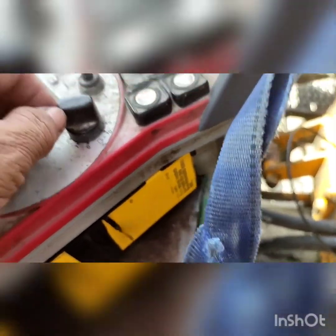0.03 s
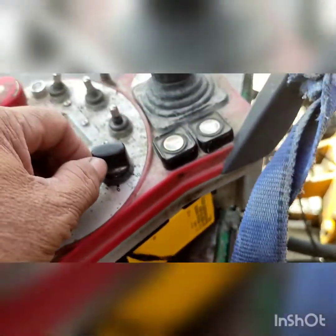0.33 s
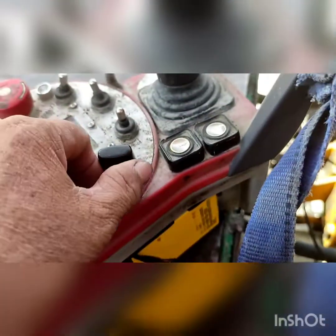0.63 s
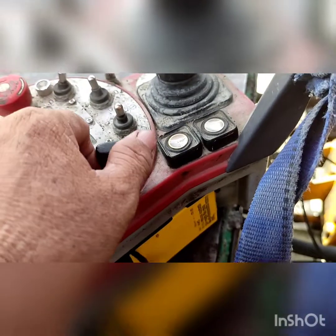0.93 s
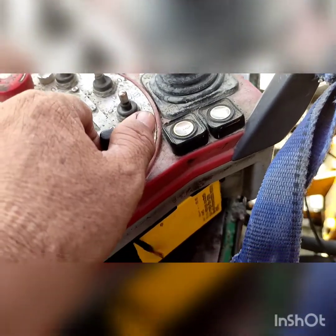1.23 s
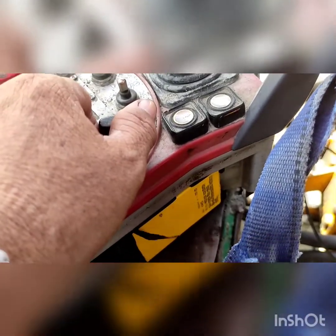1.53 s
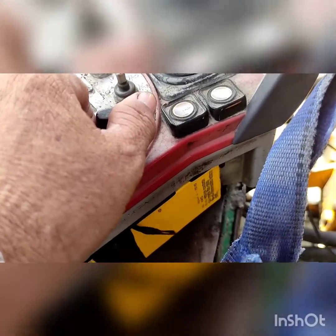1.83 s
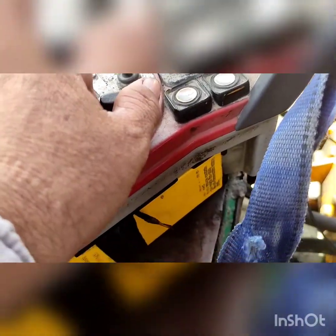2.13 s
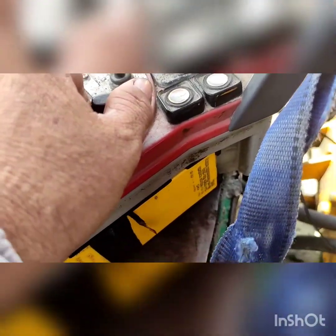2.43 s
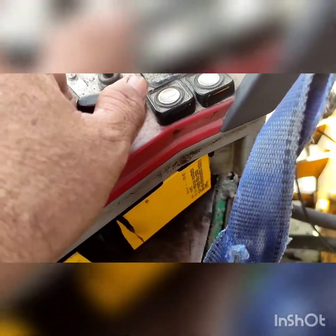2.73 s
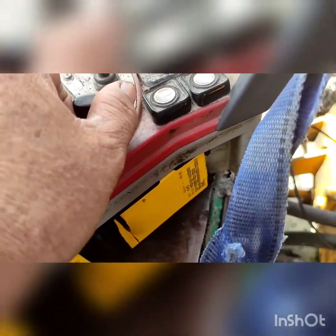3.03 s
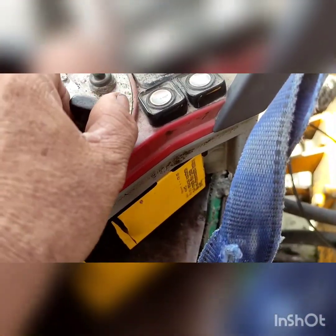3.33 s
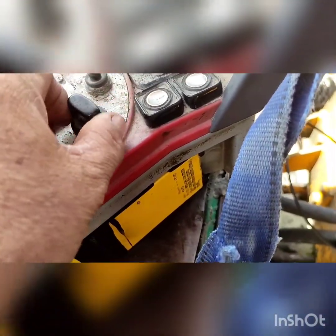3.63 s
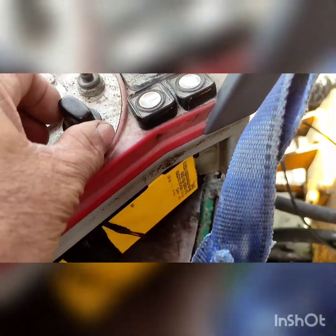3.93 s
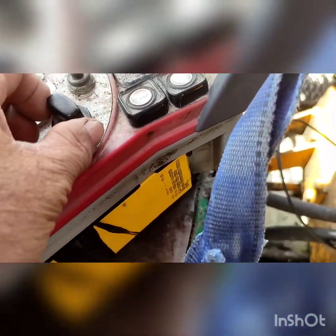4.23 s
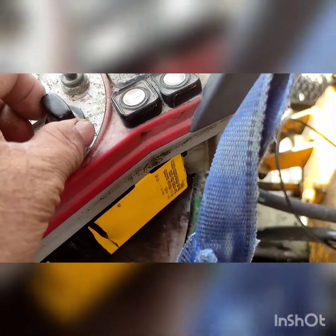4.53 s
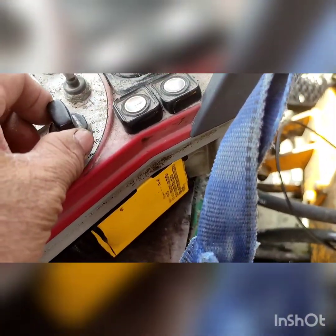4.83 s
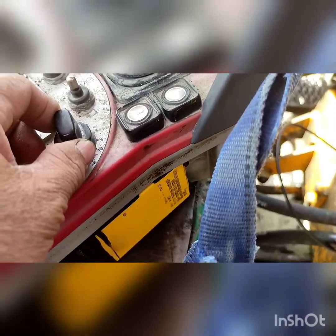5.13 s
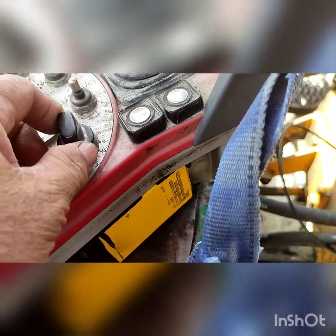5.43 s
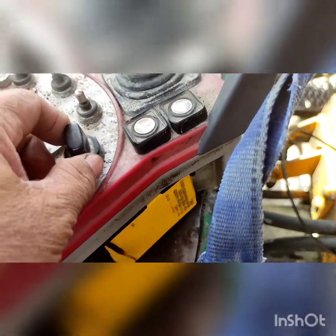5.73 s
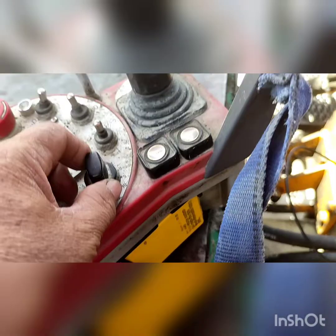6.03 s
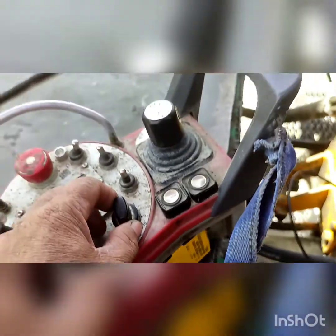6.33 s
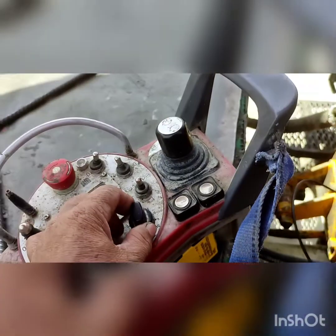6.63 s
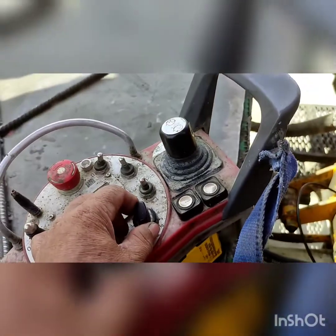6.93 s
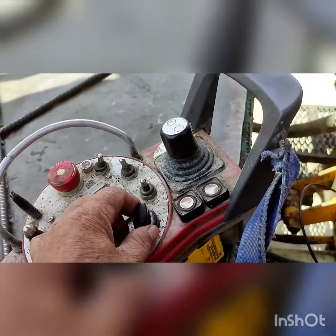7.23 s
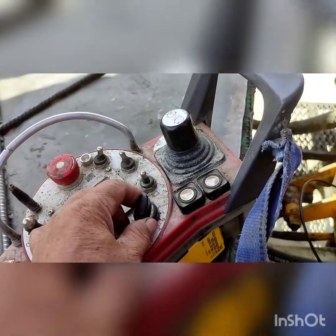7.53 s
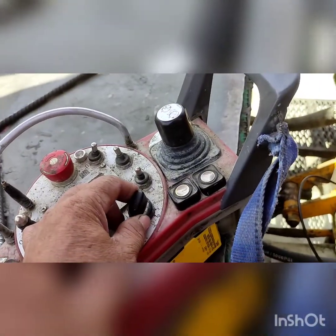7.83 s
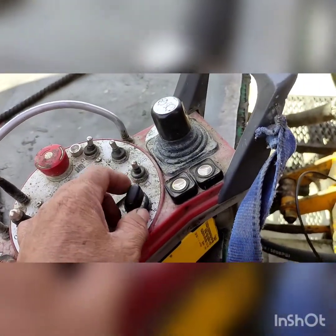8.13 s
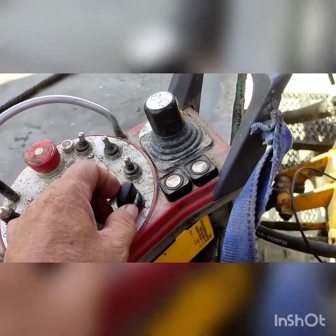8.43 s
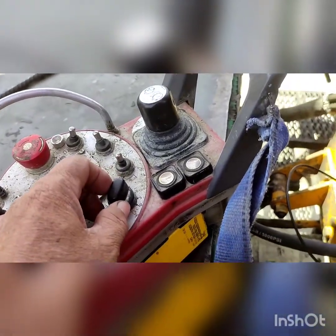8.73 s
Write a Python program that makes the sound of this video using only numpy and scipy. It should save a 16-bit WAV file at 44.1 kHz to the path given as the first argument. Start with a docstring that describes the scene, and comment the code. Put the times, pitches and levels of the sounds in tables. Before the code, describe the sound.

Three hisses of hydraulic oil, each ending in a ringing metal slam, cut through the constant roar and whine of a diesel machine.

```python
"""At the control panel of a diesel concrete pump running at steady speed. The engine roars and clatters;
the hydraulic piston pump and drive gears whine at multiples of shaft speed. Three times the stroke
changes over: pressure drops, oil hisses through a valve, the swing tube slams home and the pipe groans.
Each slam ducks the microphone's limiter. Late on, the microphone draws back, then comes close again."""
import sys
import numpy as np
from scipy import signal
from scipy.fft import rfft, irfft, next_fast_len
from scipy.io import wavfile
from scipy.ndimage import uniform_filter1d, minimum_filter1d, map_coordinates

SR = 44100
rng = np.random.default_rng(int(sys.argv[2]) if len(sys.argv) > 2 else 0)


def transcribe(signal):
    """Save signal, clipped to [-1, 1], as a 16-bit WAV file at the path in sys.argv[1]."""
    frames = np.atleast_2d(signal).T
    limited = np.clip(frames, -1, 1)
    pcm = np.round(limited * 32767).astype(np.int16)
    wavfile.write(sys.argv[1], SR, pcm)


N = 386757
TIME_S = np.arange(N) / SR
# Level changes, pump unloaded (idle = 1)
IDLE_RUMBLE_DB, IDLE_CLATTER_DB, IDLE_WHINE_DB = -4, -0.6, -8


# Exhaust, fan and injector spectra: freq_hz, density_db
EXHAUST_SPECTRUM = [(20, -30), (45, -20), (75, -9), (120, 0), (200, -2), (300, -4.5), (600, -17.5),
                    (1500, -70)]
FAN_SPECTRUM = [(80, -32), (180, -5.5), (270, -1.5), (390, 3), (520, -3.5), (690, -6.5), (770, -2),
                (850, -10), (1220, -7.5), (1500, -16), (3000, -62)]
INJECTOR_SPECTRUM = [(500, -18), (1100, -19.5), (1600, 5), (1950, -3), (2150, -0.5), (2550, -8.5),
                     (2900, -8.5), (3330, -12.5), (3750, -15), (4200, -11), (5500, -18.5), (7300, -20),
                     (8800, -19), (12000, -21), (15500, -33)]
RUMBLE_DB, ROAR_DB, CLATTER_DB = -20, -18.5, -29.5
# Level changes, microphone drawn back (back = 1)
BACK_RUMBLE_DB, BACK_ROAR_DB, BACK_CLATTER_DB = -3.8, 1.3, 0.5
REPEAT_SHARE = .55

def engine(turns, idle, back):
    """Exhaust rumble, fan roar and injector clatter; four unequal cylinders, two firings a turn."""
    cylinders = np.array([0.91, 0.42, 0.34, 0.3])
    firing = cylinders[(2 * turns).astype(int) % len(cylinders)] * np.exp(-(2 * turns % 1) / 0.75)
    rumble = stereo_noise(EXHAUST_SPECTRUM, lag_s=.0001, patchy_db=1.5)
    rumble = unit(rumble * (1 + 0.5 * firing) * amp(0.53 * wobble(12)))
    roar = stereo_noise(FAN_SPECTRUM, lag_s=.00028, patchy_db=2.5)
    roar = unit(roar * (1 + 0.07 * firing) * amp(0.11 * wobble(5.7)))
    ticking = np.sqrt(REPEAT_SHARE) * cycle_rattle(turns)
    ticking += np.sqrt(1 - REPEAT_SHARE) * rng.standard_normal((2, N))
    clatter = stereo_noise(INJECTOR_SPECTRUM, lag_s=.000339, patchy_db=2.5, source=ticking)
    clatter = unit(clatter * (1 + 0.47 * firing) * amp(1.2 * wobble(30)))
    return (amp(RUMBLE_DB + IDLE_RUMBLE_DB * idle + BACK_RUMBLE_DB * back) * rumble
            + amp(ROAR_DB + BACK_ROAR_DB * back) * roar
            + amp(CLATTER_DB + IDLE_CLATTER_DB * idle + BACK_CLATTER_DB * back) * clatter
            + halo_and_ringing(clatter, idle, back))


# Governor overshoots: centre_s, half_length_s, rise_rpm
SURGES = [(.55, .4, 4), (3.8, .22, 7), (7.15, .35, 12), (8.1, .2, 7)]
GOVERNED_RPM, SAG_RPM, SAG_PEAK_S = 2146, 10, .3

def crankshaft():
    """Turns so far; speed sags as each stroke takes load, surges and trembles."""
    ages = [np.maximum(TIME_S - slam_s, 0) / SAG_PEAK_S for _, _, slam_s, *_ in CHANGEOVERS]
    rpm = GOVERNED_RPM - SAG_RPM * sum(age * np.exp(1 - age) for age in ages) + bumps(SURGES)
    return np.cumsum(rpm * (1 + .0004 * wobble(14))) / (60 * SR)


# Piston harmonics, lowest first: level_db, balance_db, back_lift_db, swell_share
PISTON_LINES = [(-26, 1, 0.5, 0.56), (-29, -7.5, 8, 0.73), (-34, 5.5, 6.5, 0.07), (-27.5, 9.5, 3.5, 0.1)]
# Left lead per harmonic: close_ms, back_ms
PISTON_LEADS = [(.03, .1), (.15, -.2), (.2, .16), (.23, .35)]
# Swells, shared and top harmonic only: centre_s, half_length_s, lift_db
PISTON_SWELLS = [(1.13, 0.12, 10), (2.85, 0.13, 6.5), (3.68, 0.16, 6.5), (5.38, 0.25, 8.5)]
TOP_SWELLS = [(5, 1, 4.5), (6.05, 0.27, 2)]
PISTON_COUNT = 9

def hydraulic_pump(turns, idle, back):
    """Pistons sing under pressure and fade at each changeover."""
    lowest_db, piston_db, *_ = stroke_levels()
    swell_db = bumps(PISTON_SWELLS)
    spread = np.interp(back, [0, .5], [1, .15])  # near centre from halfway back
    lines = []
    for k, (db, balance_db, back_db, share) in enumerate(PISTON_LINES):
        gain = amp(db + back_db * back + share * swell_db + 1.2 * wobble(4))
        lag_s = np.interp(back, [0, .5], PISTON_LEADS[k]) / 1000
        order = PISTON_COUNT * (k + 1)
        lines.append(gain * shaft_tone(turns, order, spread * balance_db, waver=.16, lag_s=lag_s))
    lowest, *middle, highest = lines
    pistons = amp(lowest_db) * lowest + sum(middle) + amp(bumps(TOP_SWELLS)) * highest
    return amp(IDLE_WHINE_DB * idle + piston_db) * pistons


# Gear mesh at the moving microphone: time_s, level_db, balance_db, left_lead_ms
MESH_PATH = [(0, -27, 3, .17), (1.9, -26.5, 5, .19), (2.4, -20, 8, .19), (4.4, -20, 6, .17),
             (5.4, -21, 6, .16), (5.8, -24, 1, 0), (6.16, -23.5, 1, -.08), (6.2, -24, 0, -.42),
             (6.35, -21, 0, -.43), (6.42, -20, 0, -.5), (6.78, -20, 0, -.53), (6.9, -23, 0, -.46),
             (7.3, -23.5, 0, -.42), (7.55, -26, -2, -.51), (7.97, -25, -1, -.51), (8.01, -24, 2, -.04),
             (8.2, -23, 2, -.08), (8.55, -23, 0, -.28)]
# Mesh harmonics, second up: level_db, back_lift_db
MESH_OVERTONES = [(-33.5, 0.5), (-51, 2)]
MESH_ORDER, OVERTONE_FOLLOW = 33, .35
FLUTTER_START_S, FLUTTER_END_S, FLUTTER_HZ, FLUTTER_MS = 6.36, 6.78, 13, .07

def drive_gear(turns, idle, back):
    """Mesh whine; shifts between left and right as the microphone moves, with a brief fast tremble."""
    level_db, balance_db, lead_ms = curves(MESH_PATH)
    flutter = np.sin(2 * np.pi * FLUTTER_HZ * TIME_S + wobble(9))
    lead_ms += FLUTTER_MS * window(FLUTTER_START_S, FLUTTER_END_S, .05, .05) * flutter
    mesh = shaft_tone(turns, MESH_ORDER, balance_db, waver=.14, lag_s=lead_ms / 1000)
    overtones = 0
    for k, (db, back_db) in enumerate(MESH_OVERTONES, 2):
        line = shaft_tone(turns, k * MESH_ORDER, balance_db=9, waver=.33, lag_s=.00022)
        uneven_teeth = 1 + .45 * wobble(130)
        overtones += amp(db + back_db * back) * unit(line * uneven_teeth)
    load_db = level_db + IDLE_WHINE_DB * idle
    return amp(load_db) * mesh + amp(OVERTONE_FOLLOW * (load_db - level_db.max())) * overtones


# Stroke changeovers:
# drop_s, open_s, slam_s, hiss_db, rise_s, balance_db, whistle_hz, whistle_lift_db, slam_db
CHANGEOVERS = [(1.89, 1.883, 2.136, -25, .036, 3, 11900, 6, 8),
               (5.45, 5.444, 5.67, -21.5, .016, -.5, 10700, 3, 7),
               (8.18, 8.238, 8.468, -24, .028, 2.5, 12000, 3.5, 6)]
# Oil jet spectrum: freq_hz, density_db
JET_SPECTRUM = [(600, -30), (1500, 3), (3200, 1), (4500, -1), (5200, -3), (6700, -1), (7400, -5),
                (8700, -2), (10700, 4), (11400, 0.5), (11900, 3.5), (13200, -2), (15000, -3.5),
                (15900, -10)]
# Jet shading, right channel: freq_hz, gain_db
JET_SHADE = [(9300, 0), (10600, -12), (15000, -9)]
# Jet spits and lulls: centre_s, half_length_s, gain_db
SPURTS = [(1.932, .012, 11), (1.985, .025, 2.5), (5.459, .003, 11.5), (5.473, .006, 8), (5.55, .05, -2),
          (5.612, .018, 4.5), (5.655, .014, 5), (8.268, .01, 10), (8.32, .03, 5), (8.455, .015, 1.5)]
LINE_T60_S, SHUT_T60_S = 0.0092, 0.13
RASP_DB, RASP_SPIT_SHARE = -4.5, .7

def valve():
    """Oil spits, rasps, whistles and rings in the line until the tube slams home."""
    out, ring_t = np.zeros((2, N)), TIME_S[:SR // 20]
    jet = stereo_noise(JET_SPECTRUM, lag_s=.00002, patchy_db=4.5)
    jet *= amp(1.2 * wobble(35) + 1.3 * wobble(250))
    rasp, spit_db = cavitation(), bumps(SPURTS)
    rasp *= amp(RASP_DB + RASP_SPIT_SHARE * spit_db)
    for _, open_s, slam_s, db, rise_s, balance_db, whistle_hz, lift_db, _ in CHANGEOVERS:
        opening = np.clip((TIME_S - open_s) / rise_s, 0, 1) ** 2
        closing = amp(-60 * np.maximum(TIME_S - slam_s, 0) / SHUT_T60_S)
        ring = rng.standard_normal(len(ring_t)) * amp(-60 * ring_t / LINE_T60_S)
        ringing = jet + .5 * signal.oaconvolve(jet, ring[None] / np.linalg.norm(ring), axes=1)[:, :N]
        left_db = lambda hz: lift_db / (1 + ((hz - whistle_hz) / 500) ** 2)
        hiss = unit(filtered(ringing, lambda hz: amp([left_db(hz), along(JET_SHADE, hz)])))
        out += amp(db) * opening * closing * pan(balance_db) * (amp(spit_db) * hiss + rasp)
    return out


# Valve body resonances: centre_hz, width_hz, level_db, balance_db
VALVE_MODES = [(1750, 600, -3, 4), (2400, 700, -1, 5), (3250, 600, 0, 4), (4100, 260, -5, 2),
               (4600, 220, -2.5, 0), (5450, 300, -5.5, -1), (6700, 320, -5, 0)]
COLLAPSES_PER_S, CLUMP_DB, MODE_SHIFT_DB = 2500, 4, 2.5

def cavitation():
    """Bubbles collapse in clumps and ring the valve body; rms 1."""
    rate = COLLAPSES_PER_S * amp(CLUMP_DB * wobble(90))
    pops = (rng.random(N) < rate / SR) * (rng.standard_normal(N) + rng.standard_normal((2, N)))
    rasp = 0
    for centre_hz, width_hz, db, balance_db in VALVE_MODES:
        band = lambda hz: (1j * hz * width_hz / (centre_hz ** 2 - hz ** 2 + 1j * hz * width_hz)) ** 2
        rasp += amp(db + MODE_SHIFT_DB * wobble(22)) * pan(balance_db) * unit(filtered(pops, band))
    return unit(rasp)


DROP_S, BUILD_S = 0.03, 0.27

def unloaded():
    """Oil pressure loss: 1 in a changeover, 0 under full load."""
    return sum(window(drop_s, slam_s, DROP_S, BUILD_S) for drop_s, _, slam_s, *_ in CHANGEOVERS)


# Pump strokes: lowest_piston_db, all_pistons_db, gear_pair_db, gear_pair_balance_db
STROKES = [(3, -0.5, 5.5, 15.5), (-6, 0, 0.5, 2), (2, 0, 0.5, 11), (-8, 0, -1, 5)]

def stroke_levels():
    """Stroke settings per sample, crossfaded over each changeover."""
    edges_s = [s for drop_s, _, slam_s, *_ in CHANGEOVERS for s in (drop_s, slam_s)]
    return curves(np.column_stack([[0, *edges_s, N / SR], np.repeat(STROKES, 2, axis=0)]))


# Tube and hopper modes: pitch_hz, level_db, t60_s
TUBE_MODES = [(252, -10.5, 0.98), (309, -14, 0.52), (372, -4.5, 0.45), (435, -8.5, 0.068),
              (458, -9.5, 0.44), (568, -5.5, 0.065), (669, -2, 0.1), (740, -5, 0.11), (1000, -17, 0.11),
              (1420, -5, 0.026), (1710, -30, 0.065), (2200, -20, 0.12)]
REBOUND_S, REBOUND_DB = .009, -8

def slams():
    """The swing tube hits its stop, rebounds once and rings the hopper."""
    t, out = TIME_S[:SR // 2], np.zeros((2, N))
    crunch_spectrum = [(100, -24), (600, 4.5), (2000, -9.5), (6000, -37), (15000, -56)]
    for _, _, slam_s, *_, slam_db in CHANGEOVERS:
        ring = 0
        for hz, db, t60_s in TUBE_MODES:
            envelope = amp(db + rng.normal(0, 1.5) - 60 * t / t60_s)
            ring += envelope * np.sin(2 * np.pi * (hz * t + rng.random()) + rng.normal(0, .4, (2, 1)))
        crunch = shaped(rng.standard_normal((2, len(t))), crunch_spectrum)
        blow = (ring + 0.96 * crunch * amp(-60 * t / .08)) * (1 - np.exp(-t / 0.0006))
        blow += amp(REBOUND_DB) * np.pad(blow, ((0, 0), (round(REBOUND_S * SR), 0)))[:, :len(t)]
        add(out, slam_s, amp(slam_db) * blow / np.abs(blow).max())
    return out


GROAN_FROM_HZ, GROAN_TO_HZ, GROAN_FALL_S = 700, 255, .047
GROAN_DB, GROAN_T60_S = -12.5, .75

def groans():
    """After each slam the pipe rings on: a rough note, sinking as the surge dies."""
    t, out = TIME_S[:SR // 2], np.zeros((2, N))
    hz = GROAN_TO_HZ + (GROAN_FROM_HZ - GROAN_TO_HZ) * np.exp(-t / GROAN_FALL_S)
    glide = np.exp(2j * np.pi * np.cumsum(hz) / SR)
    envelope = (1 - np.exp(-t / 0.013)) * amp(GROAN_DB - 60 * t / GROAN_T60_S)
    for _, _, slam_s, *_ in CHANGEOVERS:
        roughness = 1 + .6 * (wobble(110) + 1j * wobble(110))[:len(t)]
        add(out, slam_s, pan(0) * envelope * unit(np.real(roughness * glide)))
    return out


# Frame and hose jolts: start_s, peak_db, centre_hz, length_s, rattle_db
JOLTS = [(1.589, -12, 160, 0.027, -30), (1.734, -4.5, 188, .025, -30), (1.934, -4.5, 280, 0.071, -11),
         (3.969, -8, 129, 0.014, -22), (5.495, -5, 308, 0.014, -31), (8.189, 1, 224, 0.027, -7),
         (8.216, 0, 330, 0.015, -38), (8.244, -0.5, 357, 0.11, -34), (8.276, -8, 235, 0.031, -30),
         (8.32, -6, 300, 0.12, -13), (8.675, -6.5, 95, 0.067, -22)]

def jolts():
    """Pressure kicks shake frame and hoses: dull thuds with a little metal rattle."""
    t, out = TIME_S[:SR // 2], np.zeros((2, N))
    rattle_spectrum = [(200, -21), (700, -5.5), (2200, -21.5), (5000, -34.5), (15000, -37)]
    for start_s, db, centre_hz, length_s, rattle_db in JOLTS:
        noise = rng.standard_normal(len(t)) + 0.33 * rng.standard_normal((2, len(t)))
        thud = unit(filtered(noise, lambda hz: hz / (hz + 80) / (1 + ((hz - centre_hz) / 70) ** 2)))
        envelope = (1 - np.exp(-t / 0.00096)) * np.exp(-(t / length_s) ** 2)
        shudder = (thud + amp(rattle_db) * shaped(noise, rattle_spectrum)) * envelope
        add(out, start_s, amp(db) * shudder / np.abs(shudder).max())
    return out


# Steady engine and gear lines: cycles_per_turn
HUM_ORDERS = [2, 5.5, 7.5, 11, 14.25, 15, 16.5, 34, 37, 45, 54, 72, 82.5, 90, 101]
# Same lines: level_db
HUM_DB = [-40, -29, -29, -28.5, -44.5, -33, -35, -40, -42.5, -54.5, -44, -42, -45, -47.5, -64]
# Beating gear pair: cycles_per_turn
PAIR_ORDERS = [49.5, 50.85]
PAIR_DB = -38.5

def hum(turns, idle):
    """Engine and gear lines locked to the crankshaft; higher ones waver more."""
    steady = 0
    for order, db in zip(HUM_ORDERS, HUM_DB):
        balance_db = 0.93 * along(MIC_BALANCE, order * turns[-1] * SR / N)
        steady += amp(db) * shaft_tone(turns, order, balance_db, waver=0.25 + 0.0035 * order)
    *_, stroke_db, balance_db = stroke_levels()
    pair = sum(shaft_tone(turns, order, balance_db, waver=.32, lag_s=.00024) for order in PAIR_ORDERS)
    return steady * amp(IDLE_CLATTER_DB * idle) + pair * amp(PAIR_DB + stroke_db + IDLE_WHINE_DB * idle / 2)


BUZZ_DB = -35

def buzz(turns, idle):
    """Valve gear and injectors repeat one ragged rattle every engine cycle."""
    spectrum = [(400, -11), (700, 26), (1000, -36), (1650, 9.0),
                (2600, 6.5), (3700, -33.0), (5000, -36), (9000, -66)]
    return shaped(cycle_rattle(turns), spectrum) * amp(BUZZ_DB + IDLE_CLATTER_DB * idle)


def cycle_rattle(turns, size=2048):
    """Stereo noise repeating every two turns; rms 1."""
    cycle = rng.standard_normal((2, size))
    return unit(np.array([np.interp(turns / 2 % 1 * size, np.arange(size), side) for side in cycle]))


# Whine halo (second row) and ringing bands: centre_hz, width_hz, level_db, back_lift_db
NARROW_BANDS = [(1790, 90, -42.5, -1), (2380, 170, -37, 1.5), (2720, 110, -46, 3.5), (3580, 120, -49, 1)]

def halo_and_ringing(clatter, idle, back):
    """Rough, hissy halo round the gear whine's second harmonic, plus narrow ringing bands of clatter."""
    out = 0
    for centre_hz, width_hz, db, back_db in NARROW_BANDS:
        band = filtered(clatter, lambda hz: 1 / (1 + (2 * (hz - centre_hz) / width_hz) ** 4))
        out += amp(db + back_db * back) * unit(band)
    return amp(IDLE_WHINE_DB * idle) * out


# Drone dips: start_s, end_s, bass_db, right_treble_db
DIPS = [(1.247, 1.52, -1, -6), (1.764, 1.912, -0.5, -9), (3.97, 4.474, -2, -9)]
CROSSOVER_HZ, DIP_EDGE_S = 544, 0.061

def dipped(drone):
    """Brief dips: both channels lose some bass, the right its treble."""
    bass_db = right_db = 0
    for start_s, end_s, low_db, high_db in DIPS:
        gate = window(start_s, end_s, DIP_EDGE_S, DIP_EDGE_S)
        bass_db += gate * low_db
        right_db += gate * high_db
    treble = filtered(drone, lambda hz: hz ** 2 / (hz ** 2 + CROSSOVER_HZ ** 2))
    return amp(bass_db) * (drone - treble) + np.array([treble[0], amp(right_db) * treble[1]])


# Likeness of the microphone channels: freq_hz, coherence
MIC_COHERENCE = [(60, .42), (130, .58), (290, .82), (640, .55), (1400, .45), (3000, .35), (15000, .25)]
# Left over right: freq_hz, balance_db
MIC_BALANCE = [(60, -3), (180, -1.2), (380, -.1), (700, 0), (1300, 3), (2400, 7), (4400, 0), (8000, 0),
               (15000, 4)]

def stereo_noise(spectrum, lag_s, patchy_db, source=None):
    """Noise or source, coloured in shifting patches, right channel late; rms 1."""
    def colour(hz):
        angle = np.arccos(np.clip(along(MIC_COHERENCE, hz), 0, 1)) / 2
        return amp(along(spectrum, hz)) * np.array([np.cos(angle), np.sin(angle)])
    def placement(hz):
        return pan(along(MIC_BALANCE, hz)) * np.exp(-2j * np.pi * hz * np.array([[0], [lag_s]]))
    frames = signal.stft(rng.standard_normal((2, N)) if source is None else source, nperseg=512)[2]
    patches = uniform_filter1d(rng.standard_normal(frames.shape[1:]), size=4, axis=0)
    patches = unit(uniform_filter1d(patches, size=12, axis=1))
    patchy = signal.istft(frames * amp(patchy_db * patches), nperseg=512)[1][:, :N]
    mid, side = filtered(patchy, colour)
    return unit(filtered(np.array([mid + side, mid - side]), placement))


def shaft_tone(turns, order, balance_db, waver, lag_s=0.00021):
    """Sine at a shaft order, wavering with shifting reflections; rms 1."""
    hz = order * turns[-1] * SR / N
    phase = 2 * np.pi * (order * turns + rng.random() - hz * lag_s * np.array([[0], [1]]))
    phase += waver * np.array([wobble(6), wobble(5.5)])
    return unit(pan(balance_db) * np.sin(phase) * np.exp(waver * (wobble(7) + wobble(45)) / 2))


def amp(db):
    """Decibels to gain."""
    return 10 ** (np.asarray(db) / 20)


def unit(x):
    """x at rms 1."""
    return x / np.sqrt(np.mean(x ** 2) + 1e-20)


def along(points, hz):
    """Interpolate (freq_hz, value) points on a log axis."""
    freqs, values = np.transpose(points)
    return np.interp(np.log(hz + 1), np.log(freqs + 1), values)


def curves(rows):
    """Per-sample curve for each column after time_s."""
    times, *columns = np.transpose(rows)
    return [np.interp(TIME_S, times, column) for column in columns]


def wobble(rate_hz):
    """Smooth random curve, rate_hz knots a second."""
    coarse = np.arange(0, N + 64, 64)
    knots = rng.standard_normal(int(N * rate_hz / SR) + 4)
    return np.interp(np.arange(N), coarse, map_coordinates(knots, [coarse * rate_hz / SR]))


def window(start_s, end_s, rise_s, fall_s):
    """Trapezoid: rises from start_s, falls from end_s."""
    return np.clip((TIME_S - start_s) / rise_s, 0, 1) * np.clip(1 - (TIME_S - end_s) / fall_s, 0, 1)


def bumps(rows):
    """Sum of Gaussian humps."""
    return sum(height * np.exp(-((TIME_S - centre_s) / half_s) ** 2) for centre_s, half_s, height in rows)


def filtered(x, response):
    """Apply a complex frequency response."""
    size = x.shape[-1]
    padded = next_fast_len(size + SR // 2)
    return irfft(rfft(x, padded) * response(np.fft.rfftfreq(padded, 1 / SR)), padded)[..., :size]


def shaped(x, spectrum):
    """Filter by (freq_hz, gain_db) points; rms 1."""
    return unit(filtered(x, lambda hz: amp(along(spectrum, hz))))


def pan(balance_db):
    """Constant-power gains; positive is left."""
    gains = amp(np.array([np.atleast_1d(balance_db), -np.atleast_1d(balance_db)]) / 2)
    return gains / np.sqrt(np.mean(gains ** 2, axis=0))


def add(track, start_s, sound):
    """Mix in a stereo sound."""
    part = track[:, round(start_s * SR):][:, :sound.shape[1]]
    part += sound[:, :part.shape[1]]


# Microphone position (0 at the panel, 1 drawn back): time_s, back
MIC_PATH = [(6.15, 0), (6.25, .5), (6.42, .5), (6.52, .3), (6.72, .33), (6.88, 1), (7.9, 1), (8.03, .15)]

def scene():
    """One crankshaft drives the drone; changeovers unload it and add hiss and blows."""
    turns, idle, back = crankshaft(), unloaded(), curves(MIC_PATH)[0]
    drone = (engine(turns, idle, back) + buzz(turns, idle) + hum(turns, idle)
             + hydraulic_pump(turns, idle, back) + drive_gear(turns, idle, back))
    return dipped(drone) + valve() + slams() + groans() + jolts()


def limiter(x, ceiling_db, hold_s, release_db_per_s):
    """Loud moments pull the gain down; it holds, then recovers."""
    power = np.abs(uniform_filter1d(np.mean(x ** 2, axis=0), size=160))
    over_db = np.maximum(10 * np.log10(power + 1e-9) - ceiling_db, 0)
    size = 2 * int(hold_s * SR / 2) + 1
    held_db = -minimum_filter1d(-over_db, size, origin=size // 2, mode="constant")
    ramp_db = release_db_per_s * TIME_S
    cut_db = np.maximum.accumulate(held_db + ramp_db) - ramp_db
    return x * amp(-uniform_filter1d(cut_db, size=96))


CLIP_LEVEL, TOP_HZ = .93, 15900

def record(dry):
    """Microphone limiter, soft clip, band limit."""
    limited = limiter(dry, ceiling_db=-6.5, hold_s=0.12, release_db_per_s=29.5)
    clipped = limited / (1 + np.abs(limited / CLIP_LEVEL) ** 8) ** (1 / 8)
    return filtered(clipped, lambda hz: hz < TOP_HZ)


dry = scene()
out = record(dry)
transcribe(out)
```